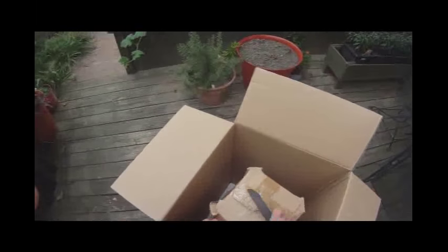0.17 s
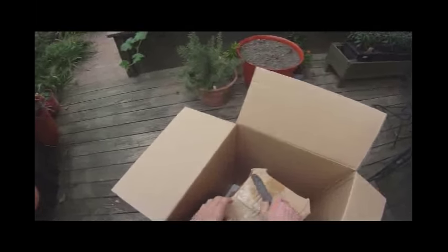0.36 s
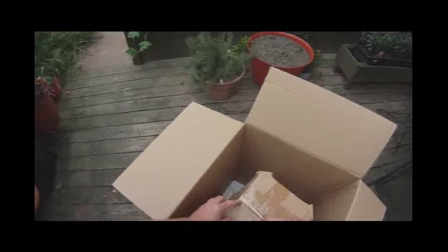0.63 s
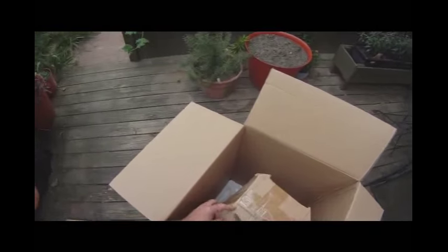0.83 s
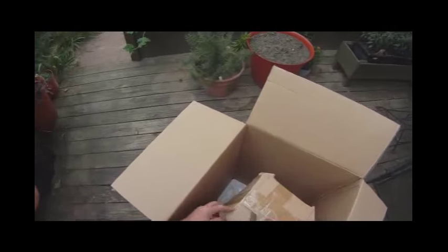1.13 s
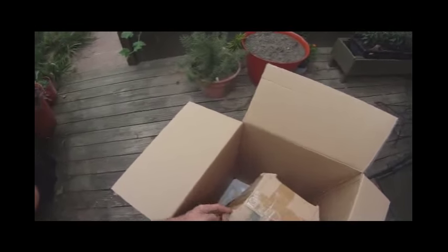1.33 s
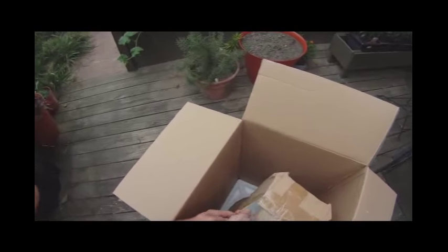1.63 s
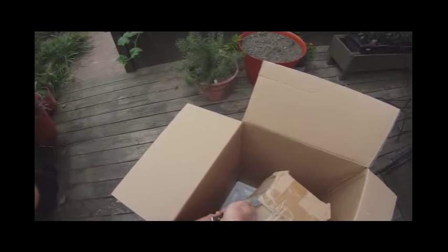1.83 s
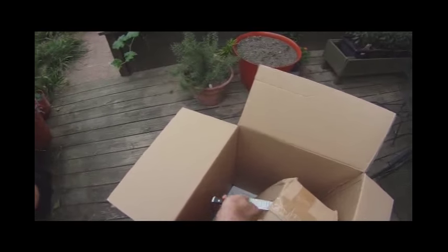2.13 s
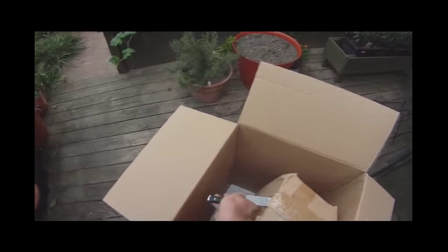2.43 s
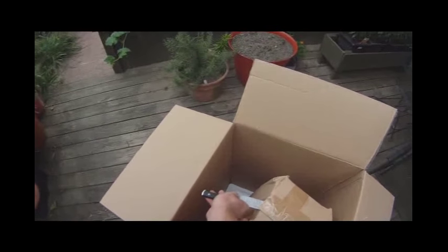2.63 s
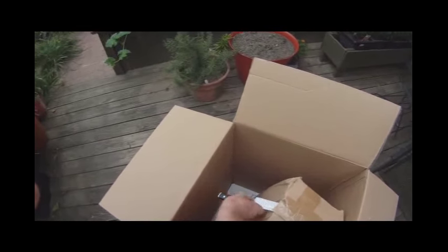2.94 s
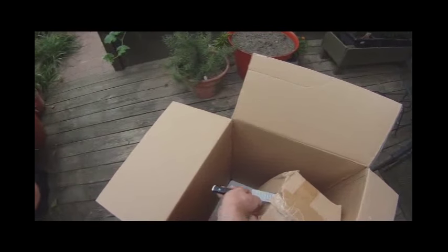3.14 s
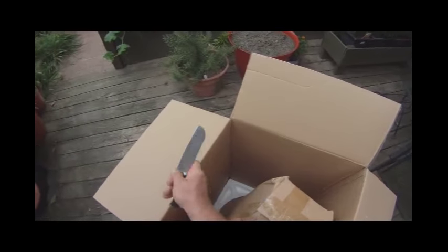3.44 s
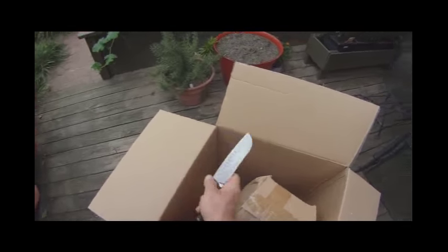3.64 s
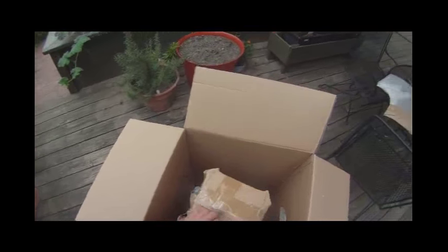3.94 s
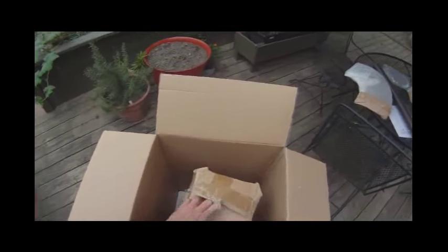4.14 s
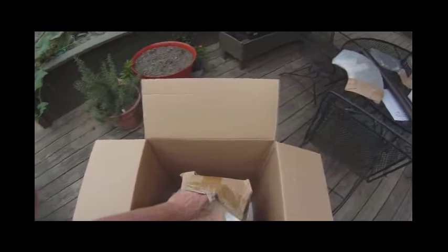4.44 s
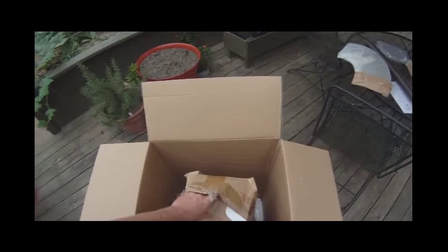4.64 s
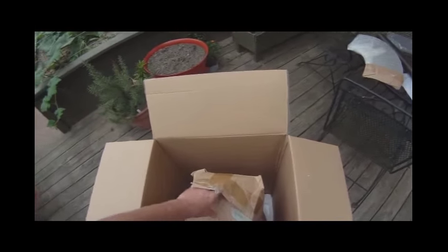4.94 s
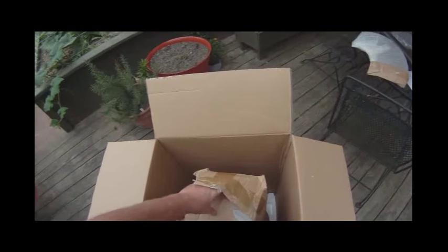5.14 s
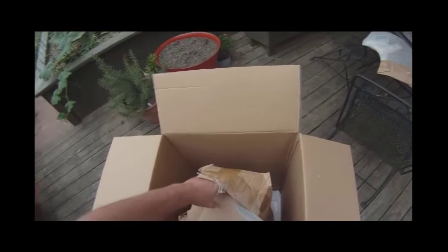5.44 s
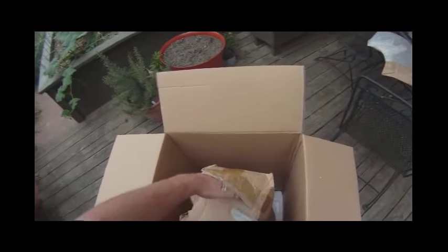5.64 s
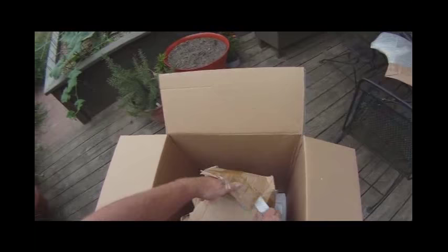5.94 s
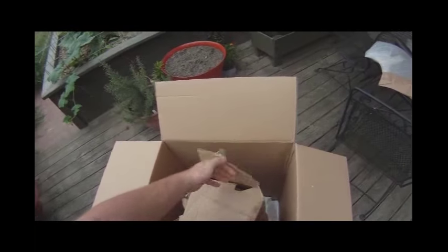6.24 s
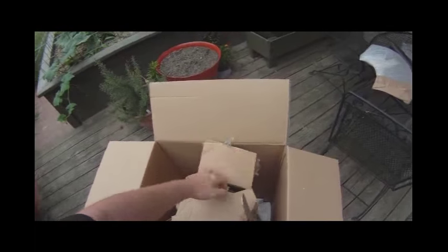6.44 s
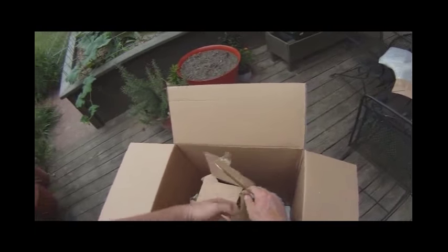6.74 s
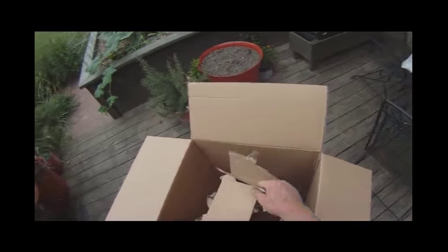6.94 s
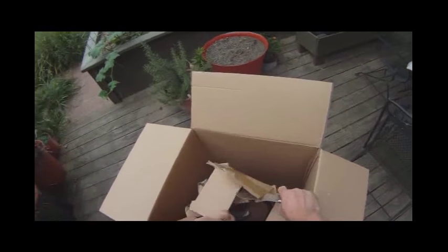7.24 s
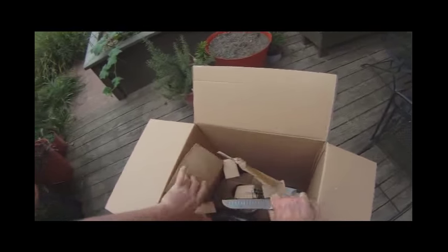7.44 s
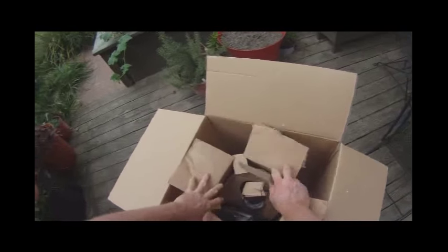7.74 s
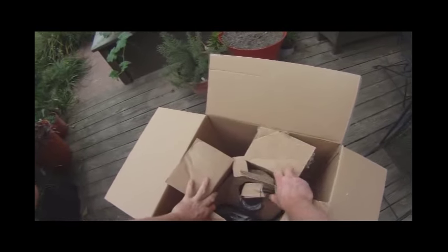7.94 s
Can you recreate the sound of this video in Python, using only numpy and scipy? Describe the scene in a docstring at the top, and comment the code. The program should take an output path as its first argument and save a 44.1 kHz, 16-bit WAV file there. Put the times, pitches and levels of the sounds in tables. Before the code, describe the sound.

A close mono microphone outdoors hears a taped cardboard packet being opened inside a big hollow carton, over a faint airy hush. From 0 to 0.7 s there is a brief scuff and tape crinkle, then several dry knocks, clearest at 0.2. Quiet handling follows until about 1.6, when taps, short rubs, crackle and a tiny squeak begin. Light scraping continues to 3.1, ending in a grainy rasp. After a tick at 3.2, a sharp bright double crack and springy knock burst out at 3.5. From 4 to 5.8, spaced knocks, scuffs and raspy squeaks at 4.7 and 5.0 alternate. A loud rough tear with tape crackle comes at 6.1, then smaller knocks, rubs and soft deep bumps. A hard hollow knock stands out at 7.7, and rustling scuffs run to 8 s.

```python
"""A taped cardboard packet is cut open with a knife and torn apart inside a big box on an outdoor deck.
Knocks are short blows and rubbing is a stream of tiny slips; both sound through three cardboard voices.
Tape crackles and ticks, some rubs squeak, the packet bumps the big box, and the blade breaks through once.
The box rings and echoes around these sounds, over a faint outdoor hush of filtered noise, all in mono."""
import sys
import numpy as np
from scipy import signal
from scipy.fft import rfft, irfft
from scipy.io import wavfile
from scipy.ndimage import uniform_filter1d

SR = 44100
rng = np.random.default_rng(int(sys.argv[2]) if len(sys.argv) > 2 else 0)


def output_pcm(signal):
    """Save a mono or channel-first signal as 16-bit PCM at the path in sys.argv[1].

    Samples are clipped to [-1, 1] before scaling.
    """
    pcm = np.clip(np.atleast_2d(signal).T, -1, 1) * 32767
    wavfile.write(sys.argv[1], SR, np.round(pcm).astype(np.int16))


N = 356328


def amp(db):
    """Turns dB into a plain factor."""
    return 10 ** (np.asarray(db) / 20)


def unit(x):
    """Scales a sound to rms 1."""
    return x / np.sqrt(np.mean(x ** 2) + 1e-20)


def burst(x):
    """Scales a short sound to the energy of rms 1 held for 20 ms."""
    energy = np.sum(x ** 2) + 1e-20
    return x * np.sqrt(0.02 * SR / energy)


def curve(rows, axis=1):
    """Joins one column of a table by straight lines in time."""
    rows = np.array(rows)
    return np.interp(np.arange(N) / SR, rows[:, 0], rows[:, axis])


def add(mix, start_s, sound):
    """Lays a sound into the mix from its start time, cutting off what runs past the end."""
    part = mix[max(round(start_s * SR), 0):][:len(sound)]
    part += sound[:len(part)]


def colour(x, points, size=4096):
    """Filters with the given spectrum, looking only at the past, so that clicks keep their sharp front."""
    hz, db = np.transpose(points)
    bins_hz = abs(np.fft.fftfreq(size, 1 / SR))
    log_gain = np.log(amp(np.interp(np.log(bins_hz + 1), np.log(hz), db)))
    # this phase puts the energy as early as the spectrum allows
    response = np.exp(np.conj(signal.hilbert(log_gain)))
    taps = np.fft.ifft(response).real[:size // 2]
    return signal.oaconvolve(x, taps)[:len(x)]


def resonate(x, hz, width_hz):
    """One resonance of gain 1, whose centre may follow a curve."""
    turn = np.exp(2j * np.pi * np.cumsum(hz * np.ones(len(x))) / SR)
    r = np.exp(-np.pi * width_hz / SR)
    # shift the centre down to 0 Hz, smooth there, and shift back
    smoothed = signal.lfilter([1 - r], [1, -r], x / turn + 1e-18)
    return 2 * (turn * smoothed).real


def wander(per_s):
    """A slow random curve of rms 1, with this many new random points a second."""
    knots = rng.standard_normal(N // 20)
    return unit(np.interp(np.arange(N) / SR * per_s, np.arange(len(knots)), knots))


def slips(per_s, spread_db, clump_db, clumps_per_s, smooth_share):
    """Tiny slips of uneven size, in clumps, over smooth friction; long swells are evened out."""
    sizes = amp(spread_db * np.minimum(rng.exponential(1, N), 4)) * rng.choice([-1, 1], N)
    clicks = unit(sizes * (rng.random(N) < per_s / SR))
    friction = smooth_share * rng.standard_normal(N)
    force = (clicks + friction) * amp(clump_db * wander(clumps_per_s))
    nearby_power = abs(uniform_filter1d(force ** 2, size=3000))
    return force / np.sqrt(nearby_power + 1e-9)


def contact(length, scatter, lead, size=4096):
    """Small random clicks swell quickly up to one main click, then die away."""
    t = np.arange(size) / SR - lead
    fade = np.exp(-np.maximum(t / max(length, 1e-4), -2 * t / lead))
    small = rng.standard_normal(size) * fade
    force = scatter * small / np.linalg.norm(small)
    force[round(lead * SR)] += 1
    return force


def effort(strokes, rest_db):
    """Strength of rubbing or crinkling: strokes that take hold, slacken and let go, over quiet handling."""
    grab_s, tire_db, let_go_s = 0.011, 2, 0.015
    power = np.ones(N) * amp(rest_db) ** 2
    for start, length, db in strokes:
        t = np.arange(0, length + 10 * let_go_s, 1 / SR)
        shape = np.minimum(t / grab_s, 1) * np.exp(-np.maximum(t - length, 0) / let_go_s)
        shape *= amp(tire_db * (0.5 - t / length))
        add(power, start, (amp(db) * shape) ** 2)
    return np.sqrt(power)


def roam(x, depth_db, per_s, count=9):
    """As the contact travels over a panel, each group of its modes swells and fades by itself."""
    hz, spectrum = np.fft.rfftfreq(N, 1 / SR), rfft(x)
    centres_hz = np.geomspace(250, 2300, count)
    out = np.zeros(N)
    for weights in np.eye(count):
        group = irfft(spectrum * np.interp(hz, centres_hz, weights), N)
        out += unit(amp(depth_db * wander(per_s))) * group
    return out


# The colour of the outdoor hush and the microphone hiss; only its shape counts.
# Each row: frequency in Hz, strength in dB per Hz.
HUSH_COLOUR = [(25, -7.5), (100, -9), (400, -3), (830, 1.5), (1400, -3), (1900, -7), (2500, -14),
               (4700, -12.5), (6000, -16.5), (8200, -12), (9300, -18.5)]


def hush():
    """Distant outdoor air and microphone hiss, as noise; two faint tones waver in it, coming and going."""
    air = unit(colour(rng.standard_normal(N), HUSH_COLOUR)) * amp(0.5 * wander(per_s=3.99))
    low = resonate(rng.standard_normal(N), hz=1870 + 20 * wander(per_s=8.8), width_hz=27)
    high = resonate(rng.standard_normal(N), hz=4500 + 250 * wander(per_s=25), width_hz=120)
    high *= amp(3 * wander(per_s=9))
    return amp(-58.5) * air + amp(-71.5) * unit(low) + amp(-78.5) * unit(high)


# The ringing air and walls of the big box.
# Each row: frequency in Hz, level in dB against the other rows, time to fade by 60 dB in seconds.
BOX_RINGS = [(151, -16, 0.13), (281, -29, 0.22), (393, -9, 0.17), (874, 2.5, 0.023), (1900, -11, 0.17)]


def box(x, ring_db, echo_db, echo_t60, yard_db, yard_t60):
    """The open box rings and throws back quick echoes; the yard adds a faint tail."""
    ring = np.zeros(N)
    for hz, db, t60 in BOX_RINGS:
        ring += amp(db) * resonate(x, hz, width_hz=np.log(1000) / np.pi / t60)
    t = np.arange(SR // 2) / SR
    near, far = rng.standard_normal((2, len(t))) * (t > 0.002)  # echoes need 2 ms to come back
    near, far = near * amp(-60 * t / echo_t60), far * amp(-60 * t / yard_t60)
    tail = amp(echo_db) * near / np.linalg.norm(near) + amp(yard_db) * far / np.linalg.norm(far)
    return x + amp(ring_db) * ring + signal.oaconvolve(x, tail)[:N]


# The packet shifts against the big box with a soft, deep bump.
# Each row: start in seconds, level in dB before the box rings, pitch in Hz.
BOX_BUMPS = [(0.409, -65, 248), (0.625, -64, 120), (1.401, -58, 257), (1.533, -47, 250), (3.979, -51, 170),
             (5.338, -50.5, 382), (6.364, -48, 262), (6.90, -48.5, 141), (7.044, -53, 110),
             (7.118, -48, 220), (7.585, -52, 120)]


def bumps(width_hz=170):
    """A soft push on the big box flexes one wall; two resonances in a row leave mostly the bass."""
    out = np.zeros(N)
    for start, db, hz in BOX_BUMPS:
        push = contact(length=0.017, scatter=1, lead=0.004)
        flex = resonate(resonate(push, hz, width_hz), hz, width_hz)
        add(out, start, amp(db) * burst(flex))
    return out


# Rubbing that locks into stick and slip.
# Each row: start in seconds, end in seconds, first pitch in Hz, last pitch in Hz,
# roughness from 0 (pure tone) to 1 (all rasp; more counts as 1), level in dB before the ends are faded.
SQUEAK_GLIDES = [(1.82, 1.88, 1566, 1550, 0, -50), (1.918, 1.947, 372, 250, .15, -50),
                 (1.954, 1.988, 860, 790, .2, -53), (2.947, 3.058, 1060, 1100, 1.1, -42.5),
                 (4.646, 4.772, 952, 1017, 0.64, -42.5), (4.985, 5.07, 1020, 1080, 0.8, -47)]


def squeaks(width_hz=380):
    """Even slips lock into a gliding tone; uneven ones only keep the same mode ringing, as a grainy rasp."""
    out = np.zeros(N)
    for start, end, from_hz, to_hz, rough, db in SQUEAK_GLIDES:
        count = round((end - start) * SR)
        hz, rough = np.linspace(from_hz, to_hz, count), np.clip(rough, 0, 1)
        catches = rng.standard_normal(count) * (rng.random(count) < 900 / SR)  # about 900 a second
        rasp = unit(resonate(resonate(catches, hz, width_hz), hz, width_hz))
        tone = unit(np.sin(2 * np.pi * np.cumsum(hz) / SR))
        squeak = unit((1 - rough) * tone + rough * rasp)
        add(out, start, amp(db) * squeak * signal.windows.tukey(count, 0.5))
    return out


# The colour of the tape; only its shape counts.
# Each row: frequency in Hz, strength in dB per Hz.
TAPE_COLOUR = [(300, -24), (1500, 0), (3200, -3), (4000, -10.5), (5300, -1.5), (6800, -12.5), (10200, -4.5),
               (12800, -1), (15200, -4)]
# Packing tape creases and peels in short bursts.
# Each row: start in seconds, length in seconds, level in dB halfway along.
TAPE_CRINKLES = [(0.0, 0.088, -57), (1.625, 0.064, -57), (1.713, .008, -56), (1.94, .13, -61),
                 (2.18, .14, -64), (2.37, 0.12, -62), (2.56, 0.13, -59.5), (2.77, 0.095, -62),
                 (2.96, 0.25, -61.5), (3.192, 0.029, -48), (3.312, 0.061, -54.5), (3.46, 0.048, -51.5),
                 (4.06, .04, -55.5), (4.16, 0.3, -60.5), (5.87, 0.034, -52), (6.1, 0.07, -46.5),
                 (6.27, 0.19, -57), (6.56, 0.043, -52), (6.665, 0.028, -54), (6.755, .012, -52.5),
                 (6.81, 0.084, -51), (6.9, .15, -60), (7.17, 0.084, -59), (7.31, 0.21, -58),
                 (7.54, 0.076, -57.5), (7.71, 0.12, -56), (7.89, .25, -53.5)]
# Single tape fibres and folds let go.
# Each row: time of the main click in seconds, level in dB, added brightness in dB per octave.
TAPE_TICKS = [(.067, -51, -4.5), (.226, -51.5, -2), (1.648, -51, -5.5), (1.688, -49.5, -5),
              (1.822, -49.5, -6), (2.588, -55.5, 1), (3.524, -35, 4), (3.5328, -44, 5), (6.077, -42, -4),
              (6.126, -42.5, -3.5)]


def tape(lead=0.0017):
    """Plastic tape and paper fibres: fine crackle with sharper ticks, brighter where the tape is taut."""
    force = slips(per_s=900, spread_db=4, clump_db=2.8, clumps_per_s=140, smooth_share=0.7)
    out = effort(TAPE_CRINKLES, rest_db=-69.5) * unit(colour(force, TAPE_COLOUR))
    pivot_hz = TAPE_COLOUR[1][0]  # the brightness tilts around here
    for time_s, db, brightness in TAPE_TICKS:
        tilted = [(hz, level + brightness * np.log2(hz / pivot_hz)) for hz, level in TAPE_COLOUR]
        tick = colour(contact(length=0.0032, scatter=1.3, lead=lead), tilted)
        add(out, time_s - lead, amp(db) * burst(tick))
    return out


# The three voices of the cardboard: pushed air, bending panel and cracking liner; only their shapes count.
# Each row: frequency in Hz, strength in dB per Hz.
THUD_COLOUR = [(25, -32), (90, -21.5), (150, -7.5), (220, -9.5), (300, -1.5), (420, 3), (550, -12),
               (1200, -41)]
PANEL_COLOUR = [(200, -29), (420, -14.5), (560, 0), (850, -3.5), (1100, -5), (1350, -8), (1700, -20),
                (3500, -47)]
CRACK_COLOUR = [(700, -22), (1200, -10), (1500, 2.5), (2030, 3), (2330, -8.5), (2750, -21), (3130, -12.5),
                (3900, -43.5), (5250, -15.5), (8000, -39.5)]


def cardboard_voices(force):
    """A force on cardboard pushes the air in the box, bends a panel and cracks the stiff liner."""
    return colour(force, THUD_COLOUR), colour(force, PANEL_COLOUR), colour(force, CRACK_COLOUR)


# Blade and hand scuff over the cardboard.
# Each row: start in seconds, length in seconds, level of the panel in dB halfway along, before it roams.
RUB_STROKES = [(0.0, .11, -51), (0.825, 0.024, -48), (1.545, 0.023, -49.5), (1.64, 0.066, -50),
               (1.705, 0.0085, -48), (1.805, 0.019, -46), (1.93, 0.14, -50), (2.083, 0.028, -48.5),
               (2.405, 0.11, -48.5), (2.569, 0.12, -52), (2.785, 0.037, -46), (2.95, 0.2, -53),
               (3.193, 0.03, -46.5), (3.31, 0.054, -53.5), (3.57, 0.17, -49.5), (4.17, 0.37, -51),
               (4.31, 0.092, -45), (4.97, 0.21, -48.5), (5.82, 0.078, -47), (6.098, 0.085, -34.5),
               (6.29, 0.023, -40.5), (6.553, 0.064, -42), (6.67, 0.032, -46.5), (6.79, 0.16, -45.5),
               (7.237, 0.016, -46.5), (7.321, .015, -44), (7.36, 0.13, -51), (7.502, 0.0091, -44),
               (7.72, 0.18, -53), (7.89, 0.25, -46)]
# The hands keep shifting on the packet between strokes.
# Each row: time in seconds, level of the panel in dB, before it roams.
HAND_SHIFTS = [(0.2, -58), (0.38, -70), (1.52, -65.5), (1.62, -50.5), (1.90, -52), (2.28, -61),
               (3.75, -52.5), (4.90, -55), (5.28, -63), (5.78, -51), (5.97, -62), (6.33, -45.5),
               (6.52, -56.5), (7.00, -50.5), (7.2, -57.5), (7.68, -58)]
# How the grip loads the panels.
# Each row: time in seconds, panel pitch in Hz, thud in dB and crack in dB against the panel.
PANEL_GRIP = [(0.0, 920, -17, -6), (1.6, 885, -4.5, -3.5), (2.65, 816, -9, -7.5), (3.0, 1050, -8.5, -8.5),
              (3.6, 890, -9.5, -6.5), (4.35, 1080, -10, -7), (5.05, 1070, -11, -12),
              (6.2, 1010, -11.5, -7.5), (8.0, 1000, -13.5, -5)]


def rubbing():
    """Slips of hand and blade drive the same three voices as the knocks; the grip tunes the panel."""
    force = slips(per_s=600, spread_db=3.5, clump_db=2.5, clumps_per_s=70, smooth_share=0.4)
    thud, panel, crack = cardboard_voices(force)
    rub = unit(resonate(panel, curve(PANEL_GRIP, axis=1), width_hz=560))
    rub += amp(curve(PANEL_GRIP, axis=2)) * unit(thud)
    rub += amp(curve(PANEL_GRIP, axis=3)) * unit(crack)
    return effort(RUB_STROKES, curve(HAND_SHIFTS)) * roam(rub, depth_db=2.8, per_s=22)


def knock(db, hz, thud_db, crack_db, length, lead):
    """A blow bends a panel, pushes the air in the box and cracks the stiff liner."""
    force = contact(length, 0.62 + 190 * length, lead)  # longer blows are more ragged
    thud, panel, crack = cardboard_voices(force)
    blow = burst(resonate(panel, hz, width_hz=270))
    blow += amp(thud_db) * burst(thud) + amp(crack_db) * burst(crack)
    return amp(db) * blow


# Cardboard is bumped or buckles; near 3.53 s the blade breaks through: two cracks, and the packet springs back.
# Each row: time in seconds, level of the panel in dB, panel pitch in Hz,
# thud in dB and crack in dB against the panel, length of the dying away in seconds.
CARDBOARD_KNOCKS = [(0.172, -50, 850, -27, -9, 0.0035), (0.228, -36, 790, -12, -7.5, 0.0099),
                    (0.298, -44, 890, -24, -17, 0.0076), (0.464, -44, 850, -38, -9.5, 0.017),
                    (0.64, -47.5, 770, -30, -10, .011), (1.630, -41.5, 1050, -6.5, -1.5, 0.0048),
                    (1.876, -44, 796, -9, -25, 0.0041), (2.026, -39.5, 840, -9, -9, 0.0046),
                    (3.244, -38, 1230, -33, -11, 0.0012), (3.5249, -34, 930, 1, 7, 0.0028),
                    (3.5328, -35.5, 845, 1, 9.5, 0.0015), (3.5385, -27.5, 830, -21, -25, 0.0035),
                    (3.641, -45, 850, 0, -24, 0.0048), (3.979, -42, 810, -3, -12, 0.0076),
                    (4.076, -39, 1080, -10, -11, 0.0098), (4.088, -37, 880, -7.5, -10.5, 0.0069),
                    (4.293, -38, 1080, -38, -9, 0.012), (4.516, -41.5, 1180, -11, -15, 0.0047),
                    (4.621, -44, 920, -6.5, -8, 0.0048), (4.853, -39.5, 940, -8.5, -10.5, 0.0055),
                    (5.156, -42.5, 845, -3, -12, 0.0068), (5.356, -42, 1030, -7, -16, 0.007),
                    (5.703, -46.5, 766, -0.5, -17, 0.0055), (5.824, -39, 970, -21, -10.5, 0.0063),
                    (6.076, -34, 930, -17, -12.5, 0.014), (6.278, -40, 830, -13, -11, 0.0074),
                    (6.454, -45, 750, -13, -9, 0.0032), (6.643, -47, 720, -9, -19, 0.0045),
                    (6.762, -45.5, 870, -20, -22, 0.0055), (6.806, -43, 895, -6, -18, 0.008),
                    (6.902, -40, 920, -7, -23, 0.0039), (7.042, -44, 796, -0.5, -12, 0.0061),
                    (7.112, -53.5, 980, -8, 0, 0.003), (7.432, -48.5, 930, -15, -10, 0.0056),
                    (7.553, -45, 840, -15, -14, 0.0073), (7.581, -46, 880, -13, -3.5, 0.0039),
                    (7.611, -48.5, 1100, -7, -4, 0.0013), (7.705, -26.5, 980, -17.5, -16, 0.0051),
                    (7.862, -42.5, 860, -3, -6.5, 0.0069)]


def knocks(quick_lead=0.001918):
    """Every knock and snap of the cardboard, each a short force that the cardboard voices answer."""
    out = np.zeros(N)
    for time_s, db, hz, thud_db, crack_db, length in CARDBOARD_KNOCKS:
        lead = quick_lead + 0.212 * length  # longer blows take longer to reach their main click
        add(out, time_s - quick_lead, knock(db, hz, thud_db, crack_db, length, lead))
    return out


def scene():
    """All packet sounds ring in the box, over the hush; both channels are the same."""
    packet = knocks() + rubbing() + bumps() + squeaks() + tape()
    boxed = box(packet, ring_db=-8.5, echo_db=-7.0, echo_t60=0.13, yard_db=-20, yard_t60=0.35)
    mono = boxed + hush()
    return np.array([mono, mono])


def record(dry):
    """The band limit of the camera: a steep filter takes away what lies above its edge."""
    edge_hz = 15400
    taps = signal.firwin(511, edge_hz, window=("kaiser", 9), fs=SR)
    return signal.oaconvolve(dry, taps[None], "same")


dry = scene()
out = record(dry)
output_pcm(out)
```